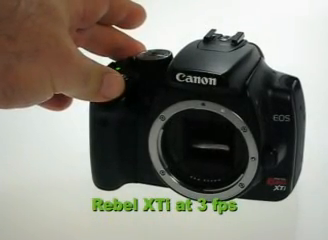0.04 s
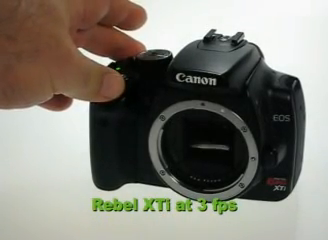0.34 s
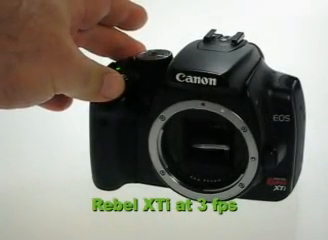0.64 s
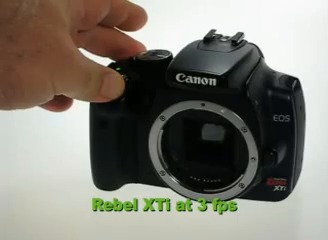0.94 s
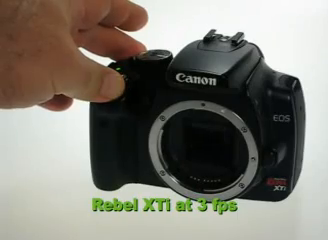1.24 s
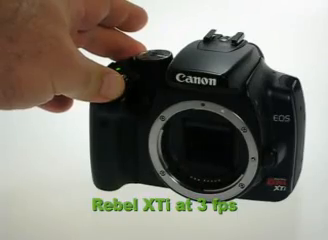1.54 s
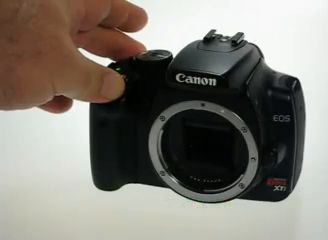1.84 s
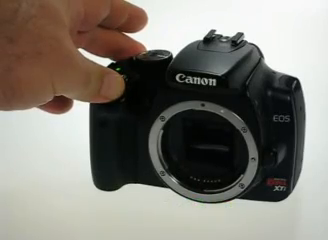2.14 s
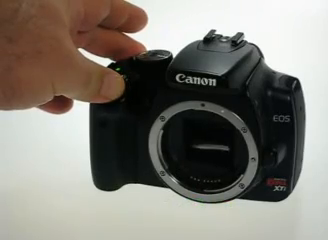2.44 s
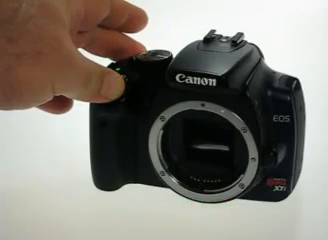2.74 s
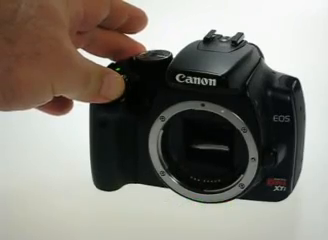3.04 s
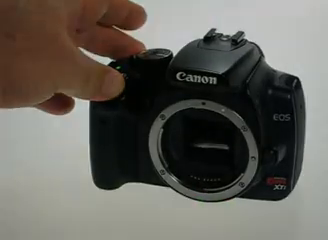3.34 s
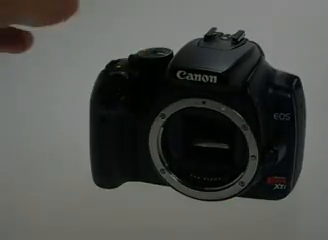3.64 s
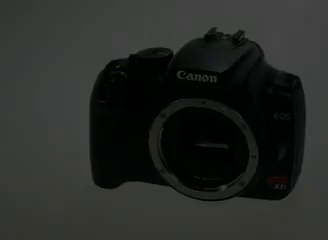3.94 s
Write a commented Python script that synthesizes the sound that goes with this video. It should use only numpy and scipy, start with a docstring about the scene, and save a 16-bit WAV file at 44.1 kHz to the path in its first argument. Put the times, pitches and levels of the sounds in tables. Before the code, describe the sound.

Rapid, even camera shutter clacks and brief winding whirs repeat in a quiet room.

```python
"""Over soft room noise and a faint high whistle, a reflex camera is firing three frames a second.
In each frame the mirror whirs up and knocks, the shutter clacks, its springs ring, and the mirror
drops back. The casing hums on while a small geared motor whines, cocking the springs again and
passing a latch on the way. After the last frame, the finger lets go of the button with faint ticks."""
import sys
import numpy as np
from scipy import signal
from scipy.fft import rfft, irfft
from scipy.io import wavfile

SR = 44100
rng = np.random.default_rng(int(sys.argv[2]) if len(sys.argv) > 2 else 0)


def wav_out(sig):
    """Save sig, one row per channel (or a flat mono array), as 16-bit PCM at SR to the path in sys.argv[1]."""
    wavfile.write(sys.argv[1], SR, np.round(np.clip(np.atleast_2d(sig).T, -1, 1) * 32767).astype(np.int16))


N = 176400
t = np.arange(N) / SR
HZ = np.fft.rfftfreq(4096, 1 / SR)

# A colour is a sound's broad balance of low and high. Modes are pitches a part likes to ring at.
# room noise colour: pitch_hz, level_db
NOISE_COLOUR = [(30, -15), (170, -8.5), (300, 0), (450, -6), (650, -6), (1200, -9), (4000, -16),
                (12600, -25), (15500, -35.5)]
# the background's closing fade: time_s, level_db
BACKGROUND_FADE = [(3.6, -4), (3.85, -6), (4, -10.5)]
# one row per frame: shutter_time_s, latch_delay_s
FRAME_TIMES = [(-.137, .1295), (.1977, .1297), (.5325, .1286), (.868, .1293), (1.2038, .1293),
               (1.5395, .1276), (1.8733, .1281), (2.207, .1279), (2.541, .1291), (2.8757, .129),
               (3.2104, .1286)]
# gears lifting the mirror: after_shutter_s, whir_db, rasp_db
LIFT_LEVELS = [(-.052, -57, -75.5), (-.047, -32, -47.5), (-.036, -33.5, -26), (-.024, -31, -26),
               (-.016, -36.5, -34), (-.005, -40.5, -51), (.004, -63, -53)]
# their whir and rasp colours: pitch_hz, level_db
WHIR_COLOUR = [(60, -20), (400, -7.5), (900, -6), (2500, -7), (5500, -21.5), (9000, -6), (15500, -26)]
BRIGHT_RASP_COLOUR = [(60, -41), (2500, -29.5), (5500, -3), (8000, -7), (10000, -21), (13500, -6.5),
                      (15500, -32)]
# their whir and rasp modes: pitch_hz, level_db, width_hz
WHIR_MODES = [(1300, 2.5, 200), (3480, 8.5, 660)]
BRIGHT_RASP_MODES = [(6900, -8, 290), (8780, 7.5, 160)]
# hits in a frame ("return" is the mirror's drop; the latch waits its own delay too):
# part, after_shutter_s, level_db, hold_s, decay_s, tilt_db_per_octave
HITS = [("return", -.0505, -31, .002, .002, -1.5), ("mirror", -.022, -7.5, .002, .0013, 0),
        ("mirror", -.0105, -25, .002, .003, -.7), ("shutter", -.003, -18.5, .0015, .0018, 1.5),
        ("shutter", -.0003, -8, .001, .0008, 3), ("shutter", .0015, -3.5, .0006, .0006, -1.5),
        ("shutter", .0094, -17, .0005, .0008, -1.5), ("return", .0328, -27, .002, .002, -1),
        ("return", .0379, -11, .001, .002, 0), ("latch", 0, -13, .0012, .0011, -.3),
        ("latch", .004, -22, .003, .004, .5)]
# per part, how much of a hit is new in each frame: share_0_to_1
FRESH_SHARE = {"mirror": 0.46, "shutter": 0.16, "return": 1, "latch": 1}
# each part's colour: pitch_hz, level_db
PART_COLOUR = {"mirror": [(40, -20.5), (150, -24), (600, -16.5), (1500, -13.5), (4000, -6), (7000, -2.5),
               (12500, -9.5), (15500, -16)], "shutter": [(40, -36.5), (150, -38), (400, -25), (750, -14.5),
               (1500, -29.5), (4500, -7), (11500, -10), (15500, -25.5)], "return": [(40, -34), (200, -38),
               (600, -51.5), (1500, -47), (4000, -22), (8000, -13.5), (12500, -21), (15500, -35)],
               "latch": [(40, -38), (150, -29), (450, -35.5), (1500, -37.5), (4000, -23.5), (8000, -18.5),
               (12500, -43), (15500, -41.5)]}
# each part's modes: pitch_hz, level_db, width_hz
PART_MODES = {"mirror": [(2100, -2.5, 110), (3530, -1.5, 250), (4890, -7.5, 840), (5680, -14, 450),
              (6400, 7, 166), (8750, -8, 1200), (10250, 1.5, 930), (10750, -1, 250), (12000, 3.5, 560)],
              "shutter": [(864, -11.5, 120), (1086, -9, 220), (1950, -1, 150), (2270, -3, 430),
              (2730, 4, 133), (3154, 3.5, 110), (3460, 2, 240), (4570, -4, 170), (6390, -3, 1100),
              (6750, -22, 250), (7480, -2, 610), (8570, -24, 470), (10200, -25, 300), (11200, -6.5, 790)],
              "return": [(1190, -14.5, 390), (1500, -13.5, 43), (1930, -12.5, 300), (2480, -12.5, 360),
              (3290, -13, 130), (3890, -11, 160), (4420, -3.5, 120), (5070, -7, 300), (6240, -9, 620),
              (7000, -20, 390), (8570, -3.5, 150), (11040, -12, 170), (11900, -17, 710)],
              "latch": [(1030, -16, 330), (2504, -18.5, 450), (3210, -8.5, 130), (3600, -10.5, 180),
              (4830, -11, 340), (6950, -20, 450), (10480, -11.5, 750), (11700, -6, 620)]}
# pushes on the camera body: after_shutter_s, peak_db, rise_s
BODY_SHOVES = [(-.021, -34, 0.00034), (.0012, -25.5, 0.00018)]
# tones of the shutter springs, and of the hollow casing and table: pitch_hz, level_db, fade_60db_s
SPRING_TONES = [(2380, -38, 0.18), (2840, -40, 0.11), (3340, -46, 0.11), (4400, -38, 0.14),
                (6550, -44, .08), (7359, -47, 0.045)]
CASING_TONES = [(249.6, -56, 2.2), (314, -50, 0.98), (418.5, -51.5, 2.4), (439, -54, 1.3)]
# the motor's run: after_shutter_s, tooth_rate_hz, rattle_db, whine_db
MOTOR_RUN = [(.045, 2100, -65, -67.5), (.078, 2400, -43.5, -38), (0.097, 2562, -32, -33),
             (.113, 2400, -29.5, -23.5), (0.146, 2355, -30.5, -31), (0.164, 2370, -32.5, -22),
             (.18, 2510, -26.5, -34), (0.196, 2678, -24.5, -23), (0.209, 2400, -31.5, -66),
             (0.224, 2400, -40.5, -61), (.26, 1996, -50.5, -77)]
# the whine's overtones: multiple_of_tooth_rate, level_db
WHINE_TONES = [(3, -1), (5, -11.5)]
# the gear tone swells as the load lets go: after_shutter_s, half_length_s, level_db
GEAR_SWELL = (0.184, 0.016, -29)
# motor gear colour: pitch_hz, level_db
MOTOR_COLOUR = [(60, -25.5), (200, -12), (400, -3), (700, -10.5), (1200, -4.5), (2000, -2), (5000, -1),
                (8000, 1), (10000, -6), (13500, -5), (15500, -17)]
# modes of the motor gears, and of the cam hitting its stop: pitch_hz, level_db, width_hz
MOTOR_MODES = [(3470, 5.5, 380), (7300, 7.5, 220), (8810, 2.5, 460)]
CAM_MODES = [(1043, 3, 250), (1383, 6.5, 240), (1940, 5.5, 80)]
# the cam's colour: pitch_hz, level_db
CAM_COLOUR = [(100, -37.5), (500, -29), (2000, -20), (15000, -40)]
# the finger leaves the button: start_s, level_db, decay_s, tilt_db_per_octave
BUTTON_TICKS = [(3.436, -40, .004, -4.5), (3.449, -38, 0.0065, -12), (3.718, -52.5, .03, -7)]
# how fast the room's echo dies: pitch_hz, fade_60db_s
ECHO_FADE = [(250, 3.1), (660, 2.25), (1740, 0.68), (4590, 0.41), (14000, 0.44)]
# the echo's colour: pitch_hz, level_db
ECHO_COLOUR = [(80, -7), (350, -15), (700, -11.5), (2500, -11), (7000, -16), (14000, -22.5)]

NOISE_DB, WHISTLE_HZ, WHISTLE_DB = -48.5, 15145, -57.5
CLICKS_PER_S, CLICK_SPREAD_DB, SHOVE_SPREAD_DB = 6500, 2.5, 1.3
SPEED_SPREAD, SPEED_WAVER = 0.00395, 0.0081  # share of motor speed: between frames, within a frame
CAM_AFTER_S, CAM_DB, CAM_DECAY_S = .192, -30, .009
OVERLOAD_LEVEL, TOP_HZ = .95, 15550


def amp(db):
    """Turns decibels into a gain."""
    return 10 ** (np.asarray(db) / 20)


def unit(x):
    """Scales a sound to an average power of 1."""
    return x / np.sqrt(np.mean(abs(x) ** 2) + 1e-20)


def read(points, hz):
    """Reads between a table's rows on a musical (log) pitch scale."""
    pitch, value = np.transpose(points)
    return np.interp(np.log(hz + 1), np.log(pitch + 1), value)


def add(mix, start_s, sound):
    """Mixes a sound in at a time, which may lie before the start."""
    i = round(start_s * SR)
    sound = sound[max(-i, 0):]
    part = mix[max(i, 0):][:len(sound)]
    part += sound[:len(part)]


def wander(count, rate_hz):
    """A smooth random drift around zero."""
    return np.interp(np.arange(count) * rate_hz / SR, np.arange(4000), rng.standard_normal(4000))


def ring(colour, modes, tilt=0):
    """How a part answers one tap: its colour plus its modes, tilted above 1000 Hz."""
    power = amp(read(colour, HZ)) ** 2
    for hz, db, width in modes:
        power = power + amp(db) ** 2 / (1 + ((HZ - hz) / width) ** 2 * 2) ** 2
    octaves = np.log2(np.maximum(HZ, 1000) / 1000)
    log_gain = np.log(np.sqrt(power) * amp(tilt * octaves))
    # choose phases so that the ringing comes after the tap
    spectrum = np.exp(np.conj(signal.hilbert(np.r_[log_gain, log_gain[-2:0:-1]])))
    response = np.fft.ifft(spectrum).real[:2048]
    return response / np.linalg.norm(response)


def chatter(hold_s, decay_s):
    """A brief burst of noise as two parts touch."""
    fade = np.exp(-np.maximum(t[:4096] - hold_s, 0) / decay_s)
    burst = fade * rng.standard_normal(len(fade))
    for _ in range(4):  # even out lows and highs
        burst = irfft(np.exp(1j * np.angle(rfft(burst)))) * np.sqrt(fade)
    return burst * np.linalg.norm(fade) / np.linalg.norm(burst)


def rattle(count, response):
    """Many uneven clicks of gear teeth ring through a part."""
    size = amp(CLICK_SPREAD_DB * np.minimum(rng.exponential(1, count), 4))
    clicks = size * rng.choice([-1, 1], count) * (rng.random(count) < CLICKS_PER_S / SR)
    return signal.fftconvolve(unit(clicks), response)[:count]


def background():
    """Soft room noise and a faint, very high whistle, both fading at the end."""
    colour = amp(read(NOISE_COLOUR, np.fft.rfftfreq(N, 1 / SR)))
    noise = unit(irfft(rfft(rng.standard_normal(N)) * colour, N))
    whistle = np.sin(2 * np.pi * np.cumsum(WHISTLE_HZ + 12 * wander(N, rate_hz=120)) / SR)
    fade = amp(np.interp(t, *np.transpose(BACKGROUND_FADE)))
    return (amp(NOISE_DB) * noise + amp(WHISTLE_DB) * whistle) * fade


def mirror_lift():
    """Gears whir as the mirror swings up, with a bright rasp that grows with its speed."""
    out = np.zeros(N)
    when, whir_db, rasp_db = np.transpose(LIFT_LEVELS)
    time = np.arange(when[0], when[-1], 1 / SR)
    whir, rasp = ring(WHIR_COLOUR, WHIR_MODES), ring(BRIGHT_RASP_COLOUR, BRIGHT_RASP_MODES)
    for db, response in (whir_db, whir), (rasp_db, rasp):
        for start, _ in FRAME_TIMES:
            add(out, start + time[0], amp(np.interp(time, when, db)) * rattle(len(time), response))
    return out


def clacks():
    """Mirror, shutter and latch strike in the same order, and nearly alike, in every frame."""
    out = np.zeros(N)
    for part, after, db, hold, decay, tilt in HITS:
        response = ring(PART_COLOUR[part], PART_MODES[part], tilt)
        usual, fresh = chatter(hold, decay), FRESH_SHARE[part]
        for start, latch_delay in FRAME_TIMES:
            blow = np.sqrt(1 - fresh ** 2) * usual + fresh * chatter(hold, decay)
            when = start + after + latch_delay * (part == "latch")
            add(out, when, amp(db) * signal.fftconvolve(blow, response))
    return out


def shoves():
    """The mirror's knock and the shutter's clack each give the whole body a short, low push."""
    out = np.zeros(N)
    for after, db, rise_s in BODY_SHOVES:
        age = t[:2048] / rise_s
        push = age * np.exp(1 - age)
        for start, _ in FRAME_TIMES:
            add(out, start + after, amp(db + SHOVE_SPREAD_DB * rng.standard_normal()) * push)
    return signal.sosfilt(signal.butter(2, 35, "high", fs=SR, output="sos"), out)


def ringing_part(tones, delay_s):
    """The springs or the casing, struck once a frame, ring on in fading pure tones."""
    out, age = np.zeros(N), t[:SR]
    for start, _ in FRAME_TIMES:
        tone = sum(amp(db - 60 * age / fade_s) * np.sin(2 * np.pi * (hz * age + rng.random()))
                   for hz, db, fade_s in tones)
        add(out, start + delay_s, tone * np.minimum(age / 0.0033, 1))
    return out


def motor():
    """The gear whine sags under the springs' load and rises as it lets go; a cam knocks on its stop."""
    out = np.zeros(N)
    when, *columns = np.transpose(MOTOR_RUN)
    time = np.arange(when[0], when[-1], 1 / SR)
    tooth_hz, rattle_db, whine_db = (np.interp(time, when, column) for column in columns)
    gears, cam = ring(MOTOR_COLOUR, MOTOR_MODES), ring(CAM_COLOUR, CAM_MODES)
    swell_s, half_length_s, swell_db = GEAR_SWELL
    swell = amp(swell_db) * np.exp(-((time - swell_s) / half_length_s) ** 2)
    for start, _ in FRAME_TIMES:
        speed = 1 + SPEED_SPREAD * rng.standard_normal() + SPEED_WAVER * wander(len(time), rate_hz=640)
        angle = 2 * np.pi * np.cumsum(tooth_hz * speed) / SR
        whine = sum(amp(whine_db + db + 2 * wander(len(time), rate_hz=900)) * np.sin(multiple * angle)
                    for multiple, db in WHINE_TONES)
        teeth = amp(rattle_db) * rattle(len(time), gears)
        add(out, start + time[0], whine + swell * np.sin(angle) + teeth)
        knock = signal.fftconvolve(chatter(0.00067, CAM_DECAY_S), cam)
        add(out, start + CAM_AFTER_S, amp(CAM_DB) * knock)
    return out


def button():
    """Faint ticks and a rub as the finger lets go."""
    out = np.zeros(N)
    for start, db, decay, tilt in BUTTON_TICKS:
        response = ring(MOTOR_COLOUR, CAM_MODES, tilt)
        add(out, start, amp(db) * signal.fftconvolve(chatter(.001, decay), response))
    return out


def nearby_echoes(sound):
    """Sound bounces quickly off the table and nearby things."""
    echoes = np.r_[np.zeros(round(.002 * SR)), chatter(hold_s=.002, decay_s=.006)]
    return amp(db=-14) * signal.fftconvolve(sound, echoes / np.linalg.norm(echoes))[:N]


def room_echo(sound):
    """A small room sends back scattered echoes; the low ones last longest."""
    echoes = rng.standard_normal(SR) * (rng.random(SR) < .15) * (t[:SR] > .004)
    hz, when, bands = signal.stft(echoes, SR, nperseg=256)
    fade_s = read(ECHO_FADE, hz)[:, None]
    bands = bands * amp(read(ECHO_COLOUR, hz)[:, None] - 60 * when / fade_s)
    bands *= np.sqrt(2 * np.log(1000) / fade_s)  # slower fades start softer
    tail = signal.istft(bands, SR, nperseg=256)[1] / np.linalg.norm(echoes)
    return signal.fftconvolve(sound, tail)[:N]


def scene():
    """The camera in its room."""
    camera = clacks() + shoves() + ringing_part(SPRING_TONES, delay_s=0.00208)
    camera += mirror_lift() + motor() + button()
    echoes = nearby_echoes(camera) + room_echo(camera)
    casing = ringing_part(CASING_TONES, delay_s=0.044)
    return (camera + echoes + casing + background())[None]


def record(dry):
    """Gently squashes the loudest clacks, then cuts the very highest treble."""
    squashed = OVERLOAD_LEVEL * np.tanh(dry / OVERLOAD_LEVEL)
    treble_cut = signal.firwin(401, TOP_HZ, window=("kaiser", 9), fs=SR)
    return signal.oaconvolve(squashed, treble_cut[None], "same")


dry = scene()
out = record(dry)
wav_out(out)
```